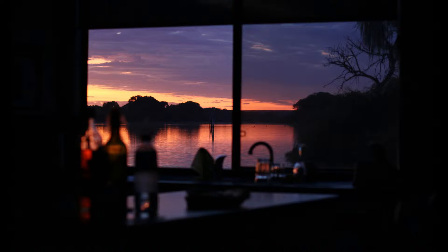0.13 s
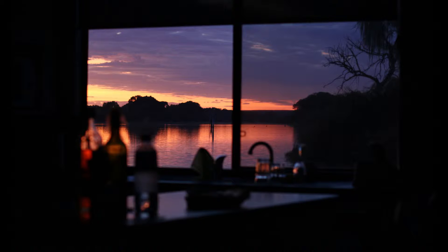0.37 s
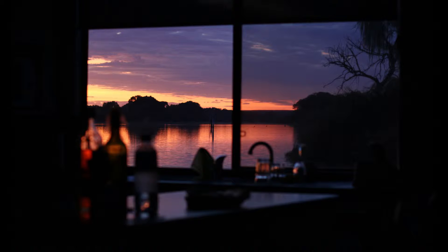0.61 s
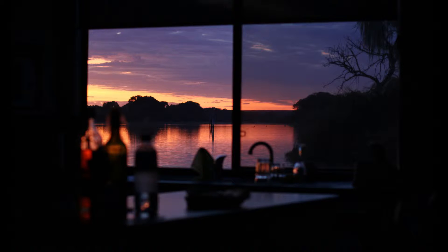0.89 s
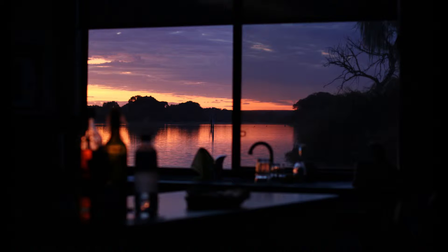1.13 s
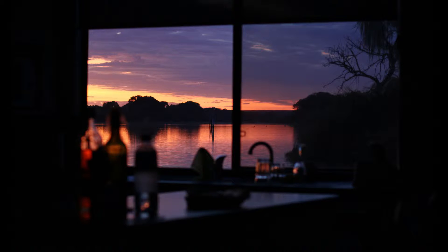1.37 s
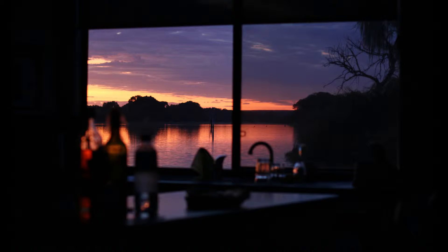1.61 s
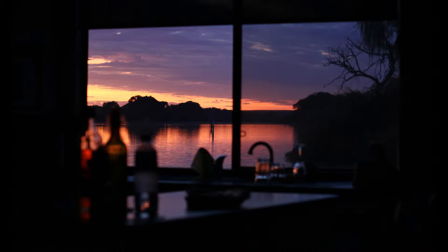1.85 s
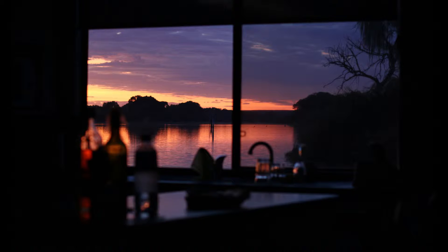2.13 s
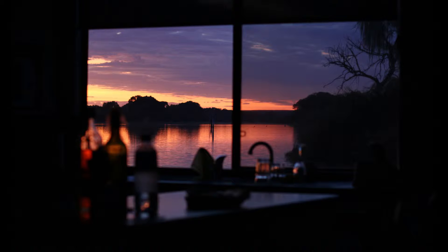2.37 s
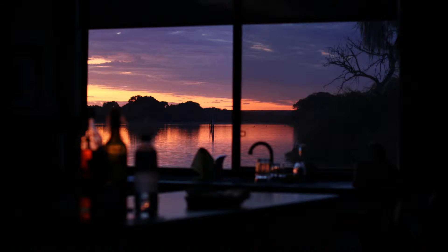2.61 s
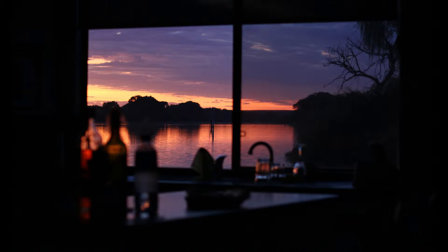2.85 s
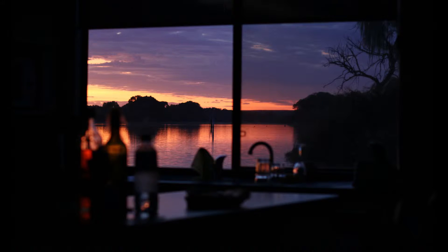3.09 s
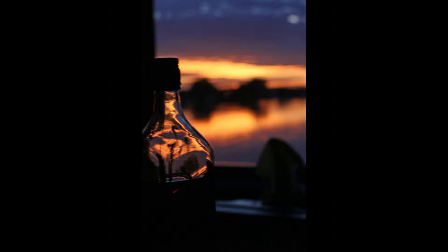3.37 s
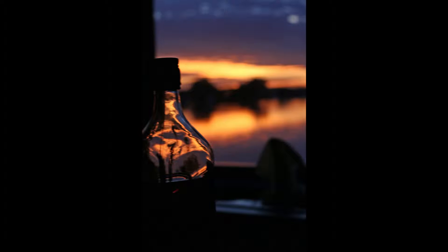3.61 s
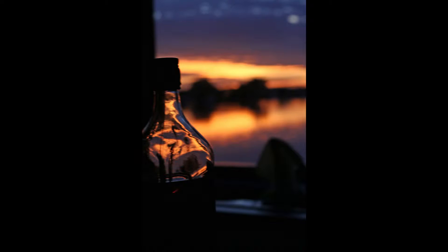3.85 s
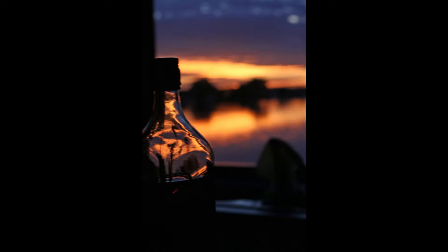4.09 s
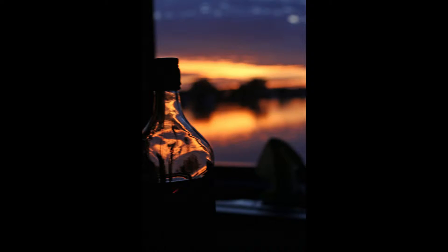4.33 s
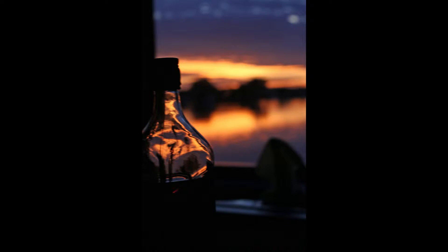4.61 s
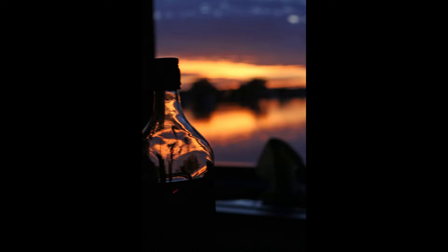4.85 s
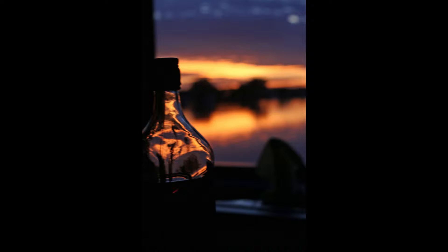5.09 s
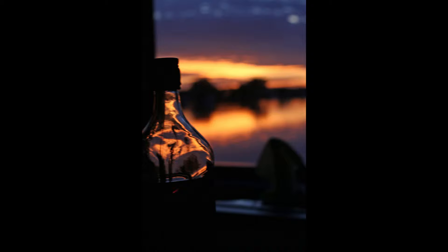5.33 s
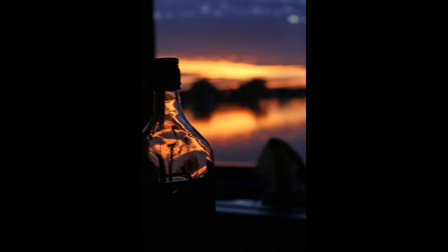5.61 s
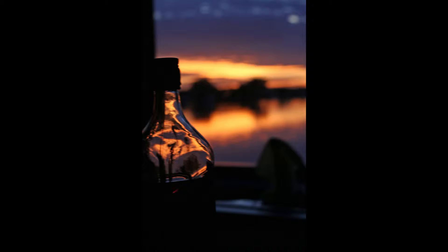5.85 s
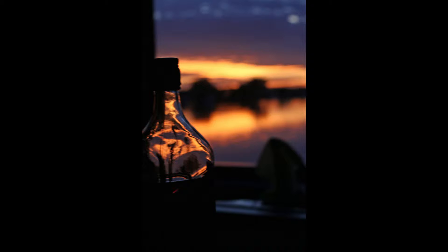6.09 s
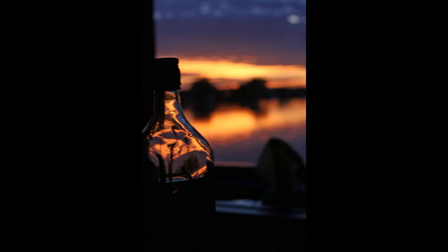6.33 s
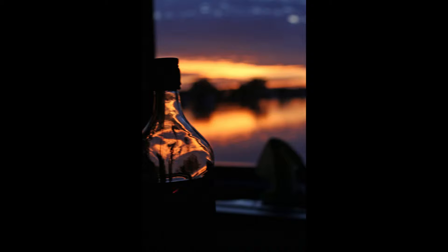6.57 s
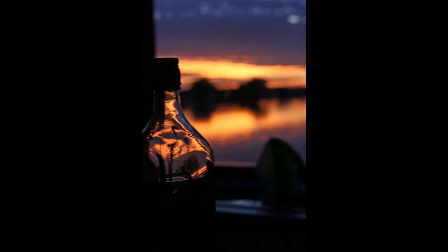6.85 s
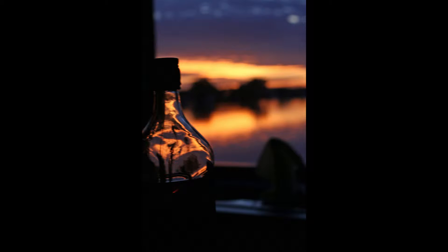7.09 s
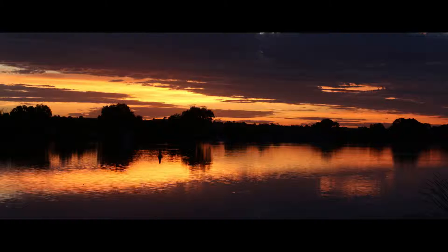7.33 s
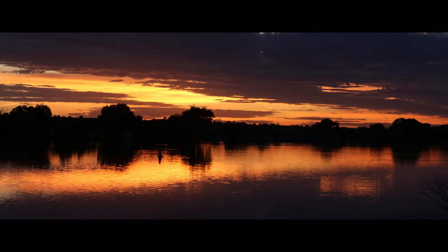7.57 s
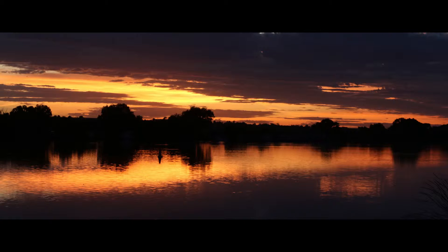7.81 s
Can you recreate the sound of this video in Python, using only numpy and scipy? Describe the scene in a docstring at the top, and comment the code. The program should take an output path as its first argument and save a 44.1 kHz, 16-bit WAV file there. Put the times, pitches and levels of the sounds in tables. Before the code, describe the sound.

Dusk bird chatter across a river: short piercing peeps around a steady high pitch, rasping squawks and quick nasal honks, loudest at the start. The flock soon quietens, returns in a moderate flurry halfway, then breaks off to near hush with small dry cracks nearby. Chirpy rising and falling whistles follow, with another squawky cluster near the end. Calls ring briefly off the banks; the main group sits to one side of a close stereo pair.

```python
"""A crowd of water birds at dusk by a river, with a faint filtered-noise hush of air and water throughout. It
opens on loud piping (unsteady sine stacks), rasping squawks (pulses and breath noise through a throat) and
nasal honks (low, sagging sine stacks), thins out after 1.3 s and thickens again from 3.5 s. Trees and banks
answer every call with noise-tail echo; at 5.1 s the built-up echo drops away, and dry noise ticks fall close
by. Sliding whistles lead the rest, as two close microphone ports hear the crowd from one side."""
import sys
import numpy as np
from scipy import signal
from scipy.fft import rfft, irfft, next_fast_len
from scipy.io import wavfile
from scipy.ndimage import uniform_filter1d, map_coordinates

SR = 44100
rng = np.random.default_rng(int(sys.argv[2]) if len(sys.argv) > 2 else 0)


def digitize_waveform(pressure):
    """Quantize a signal to 16-bit integers and store it at the path in sys.argv[1].

    Rows of a 2-D input are taken as channels; values are limited to [-1, 1].
    """
    field = np.atleast_2d(pressure).T
    bounded = np.clip(field, -1, 1)
    quanta = np.round(bounded * 32767).astype(np.int16)
    wavfile.write(sys.argv[1], SR, quanta)


def natural_amplitude(level_db):
    """Convert a level in decibels to a linear amplitude factor, elementwise."""
    exponent = np.asarray(level_db, float) / 20
    return 10 ** exponent


N = 350595  # samples in the scene

# Colour of air and water: (frequency [Hz], relative density [dB per Hz])
HUSH_COLOUR = [(15, -60), (25, -25.5), (240, -6), (537, -3.5), (970, -5.5), (2010, -7), (15500, -21)]
# Left-right correlation of the hush: (frequency [Hz], likeness [-1 to 1])
HUSH_LIKENESS = [(60, 0.25), (300, 0.65), (700, 0.8), (4000, 0.056)]
# Low wash of the water; only its swing about the mean counts: (time [s], level [dB])
WASH = [(0.0, -64.5), (2.5, -72), (3.0, -63), (3.6, -72), (5.0, -68), (5.3, -66), (6, -67.5), (7.95, -71)]
# Bustle of the whole flock: (time [s], level [dB])
BUSTLE = [(0, -38), (1.3, -35.5), (1.6, -49), (4.5, -48), (6, -70), (7.1, -50), (7.9, -41)]
# Dry cracks close by: (time [s], starting level before the tick filter [dB])
TICK_EVENTS = [(5.142, -31), (5.156, -23), (5.385, -37), (5.513, -36), (5.938, -34.5)]
# Soft low knocks: (time [s], level [dB])
KNOCK_EVENTS = [(0.523, -43), (3.133, -52), (3.35, -54.5), (5.122, -61)]
# Echo decay by pitch: (frequency [Hz], time to fall 60 dB [s])
ECHO_DECAY = [(500, 0.31), (4000, 0.32), (10000, 0.54)]
# Phase by which the left port leads: (frequency [Hz], lead [rad])
LEFT_LEAD = [(1200, 0.012), (2800, 1.4), (4100, 2.025), (7000, 1.97), (10500, 1.46)]
# Base unsteadiness by register: (starting pitch [Hz], pitch scatter [share])
PITCH_SCATTER = [(800, .03), (2600, .011), (3700, .014)]
# Nasal honks: (time [s], length before the extra tail [s], middle pitch [Hz], level [dB])
HONK_CALLS = [(0.101, 0.096, 769, -58.5), (0.217, 0.056, 727, -46), (0.275, 0.059, 753, -46.5),
              (0.44, 0.037, 771, -54), (.592, 0.029, 810, -49), (0.624, 0.039, 753, -44),
              (0.774, 0.076, 710, -62), (0.821, 0.071, 771, -41.5), (0.874, 0.037, 759, -44),
              (1.034, 0.073, 771, -51), (1.08, 0.053, 730.6, -41), (1.245, 0.094, 710.6, -45),
              (1.507, 0.053, 755, -52.5), (1.679, 0.065, 756, -55.5), (1.877, 0.18, 970, -69.5),
              (2.039, 0.042, 758, -53.5), (2.04, .07, 1074, -58.5), (2.149, 0.052, 964, -58.5),
              (2.203, 0.089, 763, -57), (2.434, 0.072, 754, -53.5), (2.597, 0.058, 828, -55.5),
              (2.697, 0.062, 791, -59.5), (2.857, 0.067, 706, -58), (2.938, 0.07, 775, -58),
              (3.05, 0.051, 745, -58), (3.195, 0.11, 728, -65.5), (3.436, 0.089, 709, -62),
              (3.525, 0.038, 762, -47), (3.563, 0.077, 776, -58), (3.661, 0.059, 756, -49.5),
              (3.719, 0.04, 696, -50.5), (3.951, 0.047, 666, -56.5), (4.017, 0.03, 720, -57),
              (4.198, 0.087, 762, -52), (4.384, 0.05, 746, -46.5), (5.022, 0.035, 709, -52),
              (5.07, 0.03, 730, -46.5), (5.416, 0.035, 556, -59.5), (5.743, 0.13, 648, -60),
              (6.765, 0.029, 487, -53), (7.575, 0.061, 588, -65), (7.806, 0.071, 840, -70),
              (7.284, 0.065, 800, -50), (7.477, 0.062, 733, -54), (7.716, 0.034, 698, -50),
              (7.756, 0.037, 632, -53)]
# Multiples 1-5 of the honk pitch, over the call level: (level [dB])
HONK_OVERTONES = [6, 6.5, 6.5, 6.5, -38]
# Throat resonance of the hoarse voice: (frequency [Hz], relative level [dB])
THROAT_COLOUR = [(120, -45), (400, -11), (1200, -12.5), (2200, -9), (2900, 7.5), (3900, 7), (4800, 9.5),
                 (5700, 3.5), (6800, -1), (8000, -2), (9500, -15.5), (12000, -22), (15500, -52)]
# Squawk bursts: (peak time [s], hold [s], effort [dB])
SQUAWK_BURSTS = [(0, 0.0013, -19.5), (0.256, 0.012, -29.5), (0.395, 0.0089, -49), (0.56, 0.015, -26.5),
                 (0.786, 0.03, -23), (1.044, 0.0067, -23.5), (1.237, 0.012, -28), (1.636, 0.053, -47),
                 (2.02, 0.015, -45), (2.224, 0.04, -49.5), (2.44, 0.0097, -37.5), (2.607, 0.085, -45.5),
                 (2.815, 0.12, -46.5), (3.024, 0.022, -42.5), (3.2, 0.08, -46.5), (3.512, 0.053, -36.5),
                 (3.671, 0.095, -33.5), (3.883, 0.11, -44), (4.17, 0.13, -45), (4.36, .01, -39),
                 (4.453, 0.089, -63), (4.857, 0.018, -62), (5.022, 0.011, -44), (5.1, 0.0045, -41.5),
                 (5.38, .01, -54.5), (5.798, 0.016, -39), (6.216, .02, -51.5), (6.344, 0.011, -46),
                 (6.664, 0.0092, -45), (6.77, .01, -50), (7.291, 0.017, -36.5), (7.46, 0.07, -37.5),
                 (7.691, 0.068, -37), (7.94, 0.013, -39.5)]
# Piped notes on one pitch: (time [s], length [s], pitch [Hz], level [dB], octave overtone over the note [dB])
HELD_NOTES = [(.01, 0.029, 4580, -21, -32), (0.037, 0.021, 3440, -18, -6), (0.186, 0.041, 3950, -25.5, -21),
              (0.248, 0.0079, 4700, -14, -48), (0.249, 0.024, 3750, -16, -15),
              (0.271, 0.036, 3930, -17, -11), (0.411, 0.025, 3890, -28, -18), (.529, 0.043, 3962, -16, -27),
              (0.543, 0.017, 4580, -19, -23), (0.575, 0.026, 4085, -12.5, -13),
              (0.755, 0.046, 2980, -24, -12), (0.759, 0.022, 3820, -12, -34),
              (0.787, 0.032, 3776, -18, -17), (0.914, 0.045, 1980, -34, -17),
              (0.947, 0.024, 3240, -28.5, -20), (1.026, .012, 4850, -20, -20),
              (1.027, 0.021, 3985, -14, -42), (1.051, 0.027, 3975, -16, -10.5),
              (1.228, 0.026, 3776, -10, -20), (1.26, 0.019, 3817, -18, -6.5),
              (0.821, 0.015, 3900, -23, -14), (1.639, 0.059, 3910, -36, -10.5),
              (1.742, 0.01, 4100, -31, -17), (2.021, 0.072, 4015, -39.5, -16),
              (2.186, 0.068, 4067, -36.5, -11.5), (2.347, 0.048, 2330, -46, -3),
              (2.422, 0.041, 2000, -44, -12), (2.549, 0.037, 4170, -31, -20),
              (2.835, 0.076, 3860, -38, -17), (2.909, 0.069, 4156, -34, -10), (2.951, 0.032, 4036, -37, -6),
              (3.055, 0.021, 4770, -28.5, -35), (3.064, 0.047, 4030, -39, -14),
              (3.198, 0.032, 3840, -36, -28), (3.234, 0.038, 3990, -36, -18),
              (3.394, 0.053, 3815, -37.5, -23), (3.516, 0.064, 3984, -20.5, -13.5),
              (3.64, 0.057, 3940, -22.5, -9), (3.711, 0.028, 4690, -24, -32),
              (3.714, 0.012, 3865, -19, -21), (3.732, 0.017, 4020, -16.5, -20),
              (3.909, 0.026, 3560, -30, -12), (3.957, 0.015, 3240, -33.5, -12),
              (3.988, 0.095, 3980, -36, -14), (4.152, 0.072, 2895, -41, -3),
              (4.163, 0.077, 4020, -29, -6.5), (4.244, 0.031, 3890, -35.5, -8),
              (4.266, 0.051, 2640, -37.5, -13), (4.353, 0.053, 3990, -25, -6.5),
              (4.401, 0.025, 4060, -31.5, -8), (4.524, 0.031, 4050, -40.5, -20),
              (4.549, 0.032, 5330, -52, -14), (3.54, .015, 5800, -31, -30), (1.199, .025, 3040, -29, -20),
              (4.752, 0.037, 1352, -45, -0.5), (4.635, .035, 4280, -46, -25),
              (4.957, .025, 3000, -47.5, -23), (4.763, 0.043, 4120, -58, -20),
              (4.783, 0.04, 3790, -48.5, -20), (4.819, 0.03, 1844, -52, -15),
              (4.805, 0.064, 4770, -35.5, -22), (4.978, 0.018, 3995, -26.5, -18),
              (4.992, 0.048, 3980, -32.5, -6), (5.044, 0.037, 3840, -23.5, -6),
              (5.047, 0.016, 3984, -23, -15), (5.132, 0.042, 3430, -50, -25),
              (5.157, 0.052, 3830, -47.5, -21), (5.307, .038, 3850, -44.5, -24),
              (5.337, 0.025, 3720, -39, -31), (5.367, .05, 4850, -51, -23), (5.382, 0.054, 3770, -44, -22),
              (5.79, 0.012, 3420, -37, -17), (6.1, .05, 4830, -52, -20), (6.21, 0.045, 4150, -47, -13),
              (6.23, 0.055, 2113, -46, -5), (6.298, 0.027, 2610, -29.5, -5),
              (6.636, 0.046, 2710, -26.5, -2), (6.699, 0.075, 2480, -29.5, -4),
              (6.924, 0.11, 3850, -43, -20.5), (7.101, 0.046, 2570, -30, -1.5),
              (7.139, 0.036, 3550, -34, -14), (7.177, 0.056, 4570, -37, -21), (7.333, 0.037, 3840, -43, -5),
              (7.155, 0.22, 1900, -53.5, -18), (7.19, 0.067, 3880, -44, -22),
              (7.432, 0.069, 3825, -31, -17), (7.595, 0.028, 4780, -38, -28),
              (7.65, 0.058, 2800, -40, -5.5), (7.664, 0.076, 3560, -37.5, -16),
              (7.693, .045, 4280, -37, -32), (7.908, 0.032, 2890, -38, -9), (7.65, 0.017, 5600, -37.5, -35)]
# Sliding whistles: (time [s], length [s], start pitch [Hz], end pitch [Hz], level [dB])
SLIDING_NOTES = [(.003, 0.05, 3955, 3670, -15.5), (0.052, 0.037, 3560, 2370, -25),
                 (0.35, 0.047, 2290, 2390, -34), (0.796, 0.02, 4520, 4840, -35),
                 (1.444, 0.085, 3076, 3540, -35), (1.548, 0.047, 3230, 2975, -36),
                 (1.95, 0.054, 3766, 3440, -31.5), (2.138, 0.05, 3130, 3380, -42.5),
                 (2.38, 0.063, 3680, 3240, -35.5), (2.347, .045, 1930, 1780, -54.5),
                 (2.417, 0.058, 2636, 2144, -36), (2.422, 0.052, 5100, 4070, -34),
                 (2.484, 0.058, 2420, 2284, -38), (2.491, 0.045, 4840, 4640, -34),
                 (2.733, 0.04, 2065, 2000, -40), (2.808, 0.045, 3830, 3850, -41.5),
                 (3.496, 0.042, 3810, 4197, -25), (4.306, 0.052, 2350, 1810, -49),
                 (4.554, 0.073, 2653, 2586, -49.5), (4.409, 0.04, 2380, 1940, -58),
                 (4.603, 0.11, 2390, 2040, -52), (4.657, 0.075, 2453, 2240, -48.5),
                 (4.842, 0.03, 4660, 4350, -47), (5.083, 0.042, 2400, 2050, -39.5),
                 (5.74, 0.11, 1138, 1714, -51), (5.76, 0.07, 2647, 2980, -39.5),
                 (5.851, 0.056, 2044, 2390, -37.5), (5.896, 0.062, 2310, 1990, -36.5),
                 (6.065, 0.042, 5530, 4680, -45.5), (6.108, 0.093, 3370, 3050, -49),
                 (6.17, 0.063, 3000, 1970, -44), (6.313, 0.023, 2720, 1990, -30.5),
                 (6.328, 0.021, 2055, 2700, -31), (6.357, 0.044, 2935, 2570, -24),
                 (6.382, 0.031, 2662, 2563, -29.5), (6.396, 0.02, 2680, 1950, -38),
                 (6.623, 0.029, 3990, 2640, -39), (6.651, 0.0232, 3266, 3825, -26),
                 (6.665, 0.039, 3826, 3550, -26.5), (6.771, 0.014, 2470, 2020, -35),
                 (6.789, 0.1, 2370, 2500, -48.5), (6.86, 0.059, 4150, 3750, -40.5),
                 (6.862, 0.019, 2450, 1760, -46.5), (6.949, 0.059, 5580, 3780, -45.5),
                 (7.214, 0.045, 2420, 3370, -48), (7.087, 0.018, 3300, 3700, -37),
                 (7.179, 0.098, 2365, 2113, -36.5), (7.246, 0.05, 4400, 4164, -21),
                 (7.283, 0.036, 4324, 3905, -20), (7.487, 0.057, 1810, 3370, -36.5),
                 (7.589, 0.054, 2470, 2114, -40.5), (7.659, 0.068, 1860, 2740, -40.5),
                 (7.716, 0.064, 3010, 3970, -38), (7.814, 0.03, 3060, 2140, -42),
                 (7.83, 0.043, 2200, 1910, -39), (7.908, 0.052, 3900, 3720, -31.5)]
# Octave overtone of the sliding whistles: (start pitch [Hz], level over the note [dB])
SLIDE_OVERTONE = [(1200, -1), (1800, -32), (2600, 0), (3100, -15.5), (3700, -7), (4400, -25)]

HUSH_DB = -55
HONK_SAG = 0.119  # share of its pitch that a honk loses from start to end
RISE_DB_PER_S, FALL_DB_PER_S = 284, 256  # slopes of a squawk burst
LULL_DB = -7  # effort between bursts, over the bustle
CUT_S, CUT_DB = 5.118, -21  # when the echo is cut short, and what is left of it


def unit(x):
    """Brings a sound to rms 1."""
    return x / np.sqrt(np.mean(x ** 2) + 1e-20)


def along(points, hz):
    """Reads (frequency [Hz], value) points on a log frequency axis."""
    f, v = np.transpose(points)
    return np.interp(np.log(hz + 1), np.log(f + 1), v)


def curve(points):
    """Draws (time [s], value) points out to one value per sample."""
    s, values = np.transpose(points)
    return np.interp(np.arange(N) / SR, s, values)


def wobble(rate):
    """A smooth random curve with rate knots a second."""
    knots = rng.standard_normal(int(N * rate / SR) + 4)
    return map_coordinates(knots, [np.arange(N) * rate / SR])


def filtered(x, response):
    """Multiplies the spectrum by a response of frequency, real or complex."""
    m = next_fast_len(N + SR // 2)
    return irfft(rfft(x, m) * response(np.fft.rfftfreq(m, 1 / SR)), m)[..., :N]


def coloured(x, spectrum):
    """Shapes a sound by (frequency [Hz], level [dB]) points and brings it to rms 1."""
    return unit(filtered(x, lambda hz: natural_amplitude(along(spectrum, hz))))


def sing(calls, flutter_db, edge_s, fade=1, faint_db=-99, bend=1):
    """Sine stacks that glide, with unsteady pitch and size.

    calls: (time [s], length [s], start [Hz], end [Hz], level [dB], overtone levels [dB]).
    The end edge is fade times as long as the start; bend over 1 delays the glide.
    """
    out = np.zeros(N + SR)
    drift, size_drift = wobble(320), natural_amplitude(flutter_db * wobble(110))
    # each overtone swells on its own
    tone_drift = natural_amplitude(flutter_db * np.array([wobble(45) for _ in range(5)]))
    for s, length, start_hz, end_hz, db, tones_db in calls:
        at = round(s * SR)
        t = np.arange(min(round(length * SR), N - at)) / SR
        span = slice(at, at + len(t))
        waver = along(PITCH_SCATTER, start_hz) * (1 + max(0, faint_db - db) / 8)  # faint calls waver more
        glide = start_hz + (end_hz - start_hz) * (t / length) ** bend
        hz = glide * (1 + waver * drift[span])
        phase = 2 * np.pi * np.cumsum(hz) / SR
        edges = np.minimum(t, (length - t) / fade) / edge_s
        shape = np.sin(np.pi / 2 * np.clip(edges, 0, 1)) ** 2
        stack = np.zeros(len(t))
        for k, tone_db in enumerate(tones_db):
            audible = (k + 1) * hz < SR / 2
            stack += natural_amplitude(tone_db) * tone_drift[k, span] * np.sin((k + 1) * phase) * audible
        out[span] += natural_amplitude(db) * shape * size_drift[span] * stack
    return out[:N]


def crowd(count, centre_hz, spread, tones_db):
    """Many short random calls, mostly falling, scattered around a pitch; rms 1."""
    s, length = rng.uniform([0, .008], [N / SR - .01, .03], (count, 2)).T
    pitch, glide, size = rng.standard_normal((count, 3)).T
    start_hz = centre_hz * np.exp(spread * pitch)
    end_hz = start_hz * (.95 + .04 * glide)
    calls = [(*row, tones_db) for row in zip(s, length, start_hz, end_hz, 2 * size)]
    return unit(sing(calls, flutter_db=2.0, edge_s=0.0056))


def hush():
    """Air and water: partly shared noise on both sides, its low part lapping unevenly."""
    def mid_side(hz):
        turn = np.arccos(np.clip(along(HUSH_LIKENESS, hz), -1, 1)) / 2
        return np.array([np.cos(turn), np.sin(turn)])

    mid, side = filtered(rng.standard_normal((2, N)), mid_side)
    air = coloured(np.array([mid + side, mid - side]), HUSH_COLOUR)
    low = filtered(air, lambda hz: hz ** 2 / (hz ** 2 + 150 ** 2) / (1 + (hz / 600) ** 4))
    wash_db = curve(WASH) + 1.5 * wobble(8)
    lapping = (natural_amplitude(wash_db - wash_db.mean()) - 1) * low
    return natural_amplitude(HUSH_DB + 0.55 * wobble(3.44)) * (air + lapping)


def banks(x):
    """Trees and banks scatter an echo that builds up over a few ms; a new noise tail every quarter second."""
    out, step = np.zeros((2, N + 2 * SR)), SR // 4
    for at in range(0, N, step):
        hz, t, z = signal.stft(rng.standard_normal((2, SR // 2)), SR, nperseg=256)
        swell = 1 - np.exp(-t / .01)
        decay = natural_amplitude(-60 * t / along(ECHO_DECAY, hz)[:, None])
        tail = signal.istft(z * swell * decay, SR, nperseg=256)[1]
        tail = tail / np.linalg.norm(tail[0])
        wet = signal.fftconvolve(x[None, at:at + step], tail, axes=1)
        out[:, at + 300:][:, :wet.shape[1]] += wet  # echo starts 300 samples late
    return filtered(out[:, :N], lambda hz: hz ** 4 / (hz ** 4 + 140.0 ** 4))


def murmur():
    """Far honkers all along the shore: a crowd of low calls that follows the bustle."""
    return natural_amplitude(curve(BUSTLE)) * crowd(count=400, centre_hz=740, spread=.16, tones_db=HONK_OVERTONES)


def ticks():
    """Tiny dry cracks of fast-dying noise, 60 dB in 28 ms."""
    out, t = np.zeros(N + SR), np.arange(SR // 50) / SR
    for s, db in TICK_EVENTS:
        out[round(s * SR):][:len(t)] += natural_amplitude(db - 60 * t / 0.028) * rng.standard_normal(len(t))
    return filtered(out[:N], lambda hz: hz / (hz + 700) / (1 + (hz / 5000) ** 2))


def knocks():
    """Soft low knocks: short sines falling from 350 to 300 Hz."""
    calls = [(s, .03, 350, 300, db, [0]) for s, db in KNOCK_EVENTS]
    return sing(calls, flutter_db=1.5, edge_s=0.0052)


def honks():
    """Low nasal calls, rich in overtones, sagging in pitch."""
    up, down = 1 + HONK_SAG / 2, 1 - HONK_SAG / 2
    calls = [(s, length + 0.017, hz * up, hz * down, db, HONK_OVERTONES)  # 17 ms of extra tail
             for s, length, hz, db in HONK_CALLS]
    return sing(calls, flutter_db=2.2, edge_s=.018, fade=3, bend=1.8)


def effort():
    """Squawking effort in dB: bursts rise fast, hold and fall more slowly, piling up over the lull."""
    t = np.arange(N) / SR
    power = natural_amplitude(curve(BUSTLE) + LULL_DB) ** 2
    for s, hold, db in SQUAWK_BURSTS:
        rise = RISE_DB_PER_S * np.maximum(s - t, 0)
        fall = FALL_DB_PER_S * np.maximum(t - s - hold, 0)
        power = power + natural_amplitude(db - rise - fall) ** 2
    return 10 * np.log10(power)


def voice():
    """Uneven pulses near 820 a second, each with a puff of breath noise; overtones flare and die apart."""
    cycle = np.cumsum(820 * (1 + .09 * wobble(22) + .03 * wobble(300))) / SR
    pulses = np.diff(np.floor(cycle), prepend=0) * natural_amplitude(2 * wobble(350))
    puffs = (1 + np.cos(2 * np.pi * cycle)) * rng.standard_normal(N)
    z = signal.stft(unit(pulses) + .4 * unit(puffs), nperseg=128)[2]
    flares = uniform_filter1d(rng.standard_normal(z.shape), size=2, axis=0)  # across pitch
    flares = uniform_filter1d(flares, size=6, axis=1)  # along time
    return signal.istft(z * natural_amplitude(5 * unit(flares)), nperseg=128)[1][:N]


def squawks():
    """A hoarse voice through the throat, brighter with effort; crowds chirp along. Returns near, ahead."""
    effort_db = effort()
    # each pulse rings out over a few ms, higher pitches later
    smear = lambda hz: np.exp(-1j * np.pi * .002 * hz ** 2 / 8000)
    throat = filtered(coloured(voice(), THROAT_COLOUR), smear)
    top = filtered(throat, lambda hz: hz ** 4 / (hz ** 4 + 13840.0 ** 4))
    hoarse = throat + (natural_amplitude(0.9 * (effort_db + 44.0)) - 1) * top
    # the near crowd pipes close to a single pitch, the one ahead spreads wide
    near_chirps = crowd(count=1800, centre_hz=4000, spread=.04, tones_db=(0, -16))
    ahead_chirps = crowd(count=1800, centre_hz=4000, spread=.15, tones_db=(0, -16))
    near = hoarse + natural_amplitude(-2) * near_chirps
    ahead = natural_amplitude(-2) * ahead_chirps
    return natural_amplitude(effort_db) * near, natural_amplitude(effort_db) * ahead


def piping():
    """Whistled notes, held or sliding, as sine stacks whose higher multiples follow the octave."""
    held = [(s, length, hz, hz, db, octave_db) for s, length, hz, db, octave_db in HELD_NOTES]
    slid = [(*row, along(SLIDE_OVERTONE, row[2])) for row in SLIDING_NOTES]
    calls = []
    for *row, octave_db in held + slid:
        tones_db = (0, octave_db, 4.05 * octave_db, 1.7 * octave_db - 24.5, 1.1 * octave_db - 34)
        calls.append((*row, tones_db))
    return sing(calls, flutter_db=1.8, edge_s=.008, fade=.8, faint_db=-33)


def ports(group):
    """Two close ports: the left hears the group first, the right gets more of the top."""
    def response(hz):
        tilt = natural_amplitude(np.outer([-1, 1], 1.6 * (hz > 7000)))
        return tilt * np.exp(.5j * np.outer([1, -1], along(LEFT_LEAD, hz)))

    return filtered(group, response)


def scene():
    """The main group from one side, the rest from ahead; the built-up echo drops away at 5.1 s."""
    near, ahead = squawks()
    group = piping() + honks() + near
    heard_far = group + ahead + murmur()  # the far honkers arrive only as echo
    direct = ports(group) + ahead
    early = np.arange(N) < CUT_S * SR
    old_echo = banks(heard_far * early) * np.where(early, 1, natural_amplitude(CUT_DB))
    new_echo = natural_amplitude(-1.0) * banks(heard_far * ~early)
    return direct + natural_amplitude(-4) * (old_echo + new_echo) + ticks() + knocks() + hush()


def band_limit(x):
    """A steep low-pass at the top of the band."""
    return signal.sosfilt(signal.butter(12, 15720, fs=SR, output="sos"), x)


def record(dry):
    """The recorder keeps nothing above its band limit of 15720 Hz."""
    mix = filtered(dry, lambda hz: hz < 15720)
    return band_limit(mix)


dry = scene()
out = record(dry)
digitize_waveform(out)
```